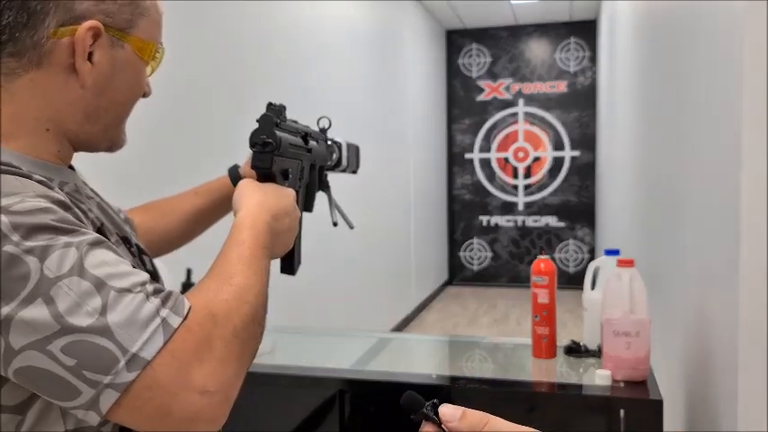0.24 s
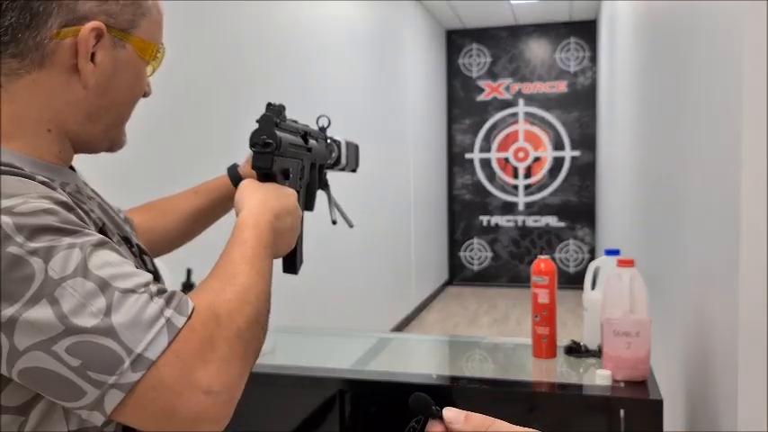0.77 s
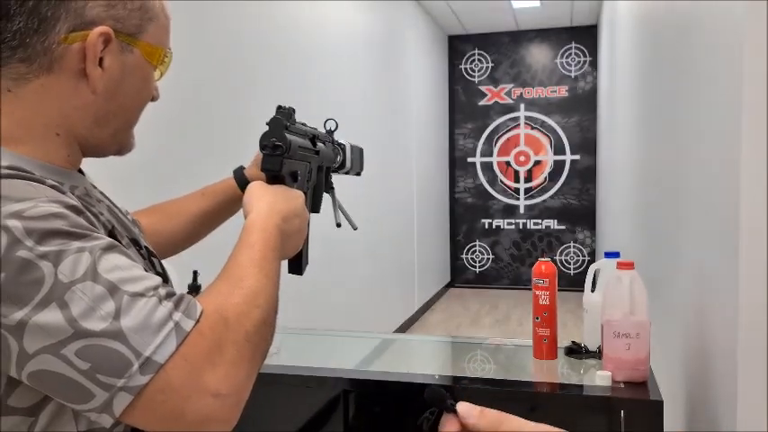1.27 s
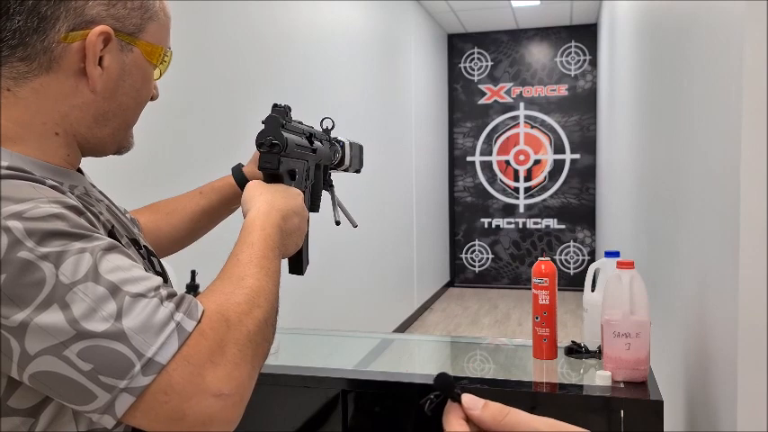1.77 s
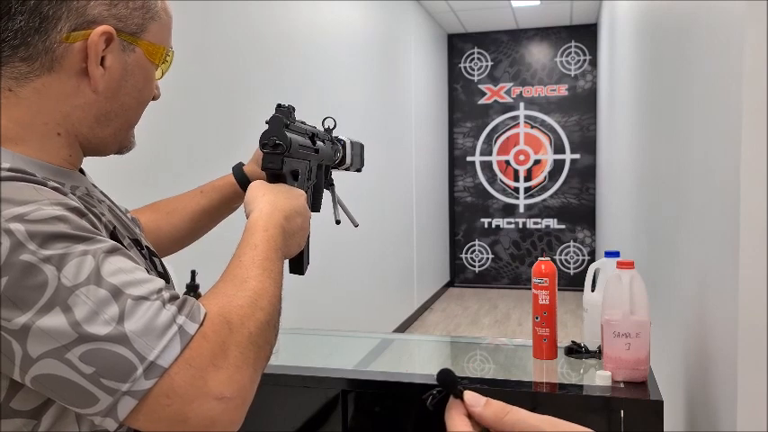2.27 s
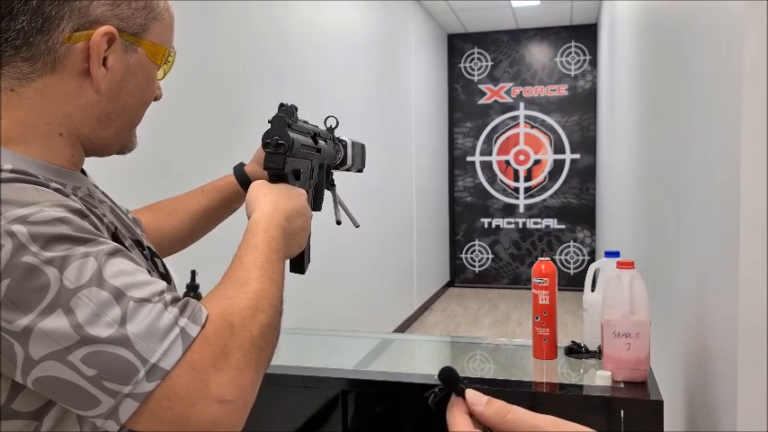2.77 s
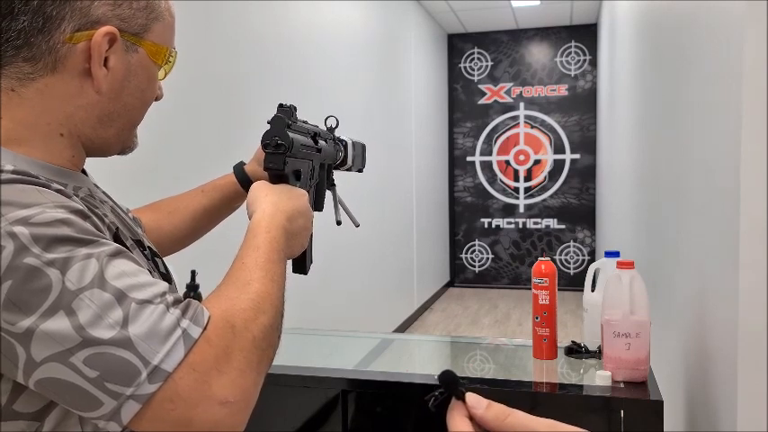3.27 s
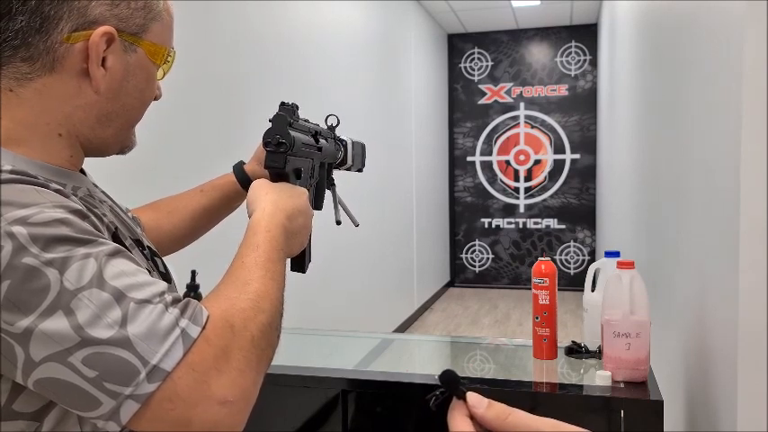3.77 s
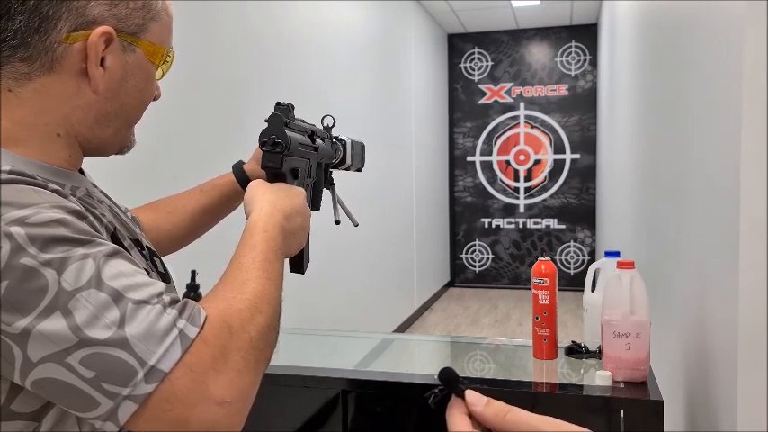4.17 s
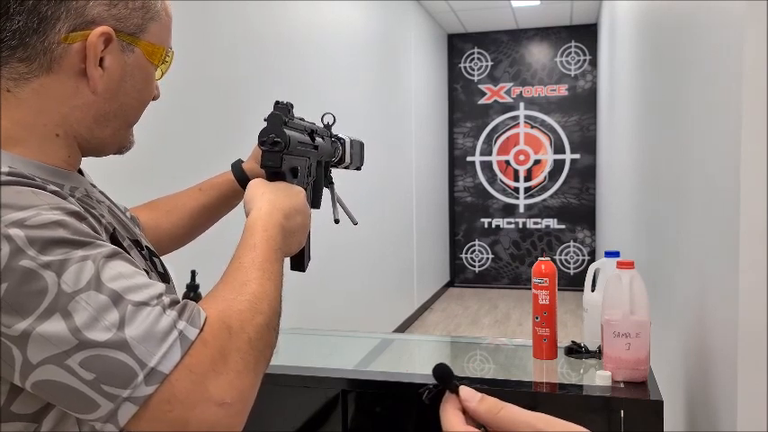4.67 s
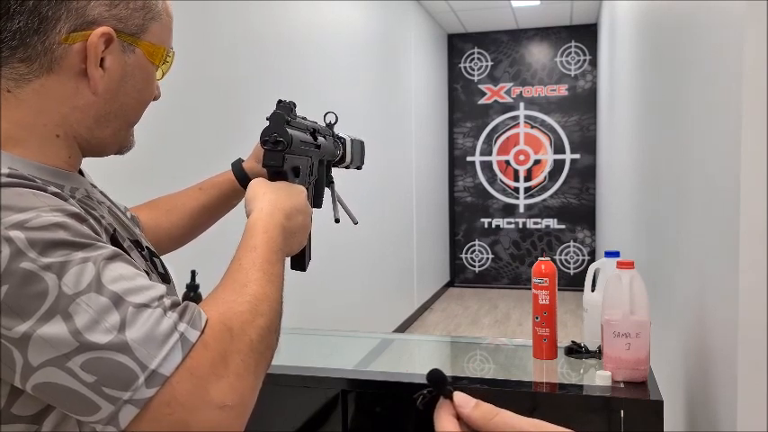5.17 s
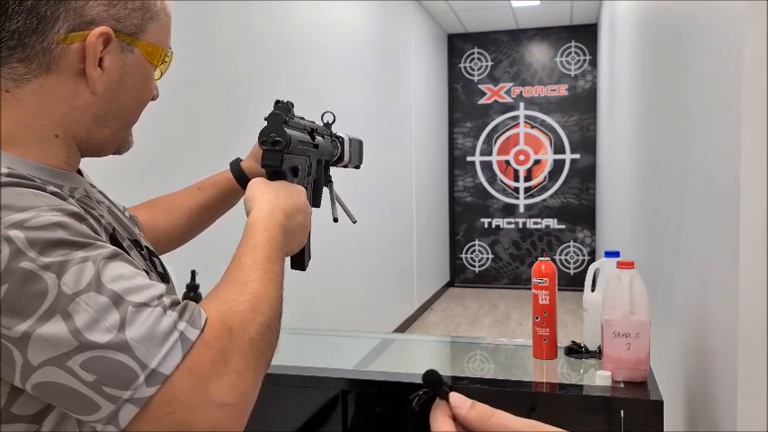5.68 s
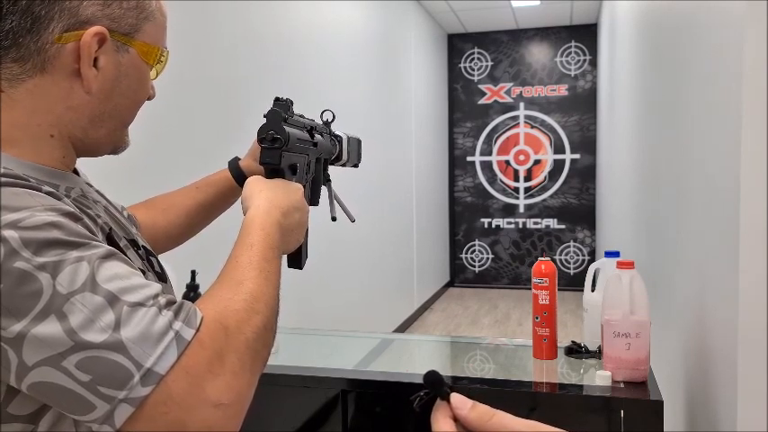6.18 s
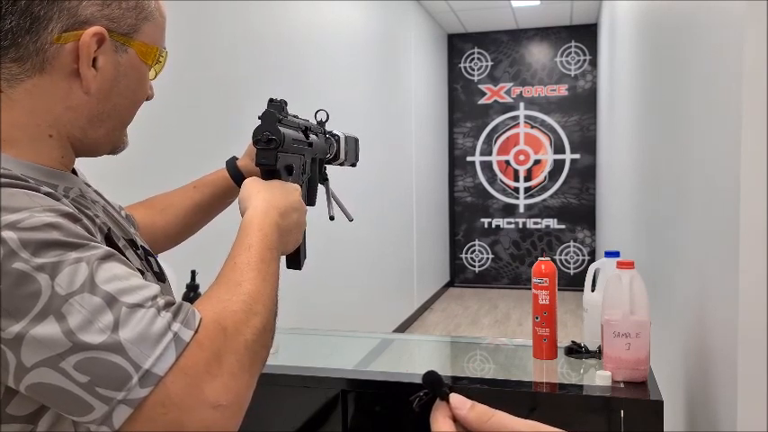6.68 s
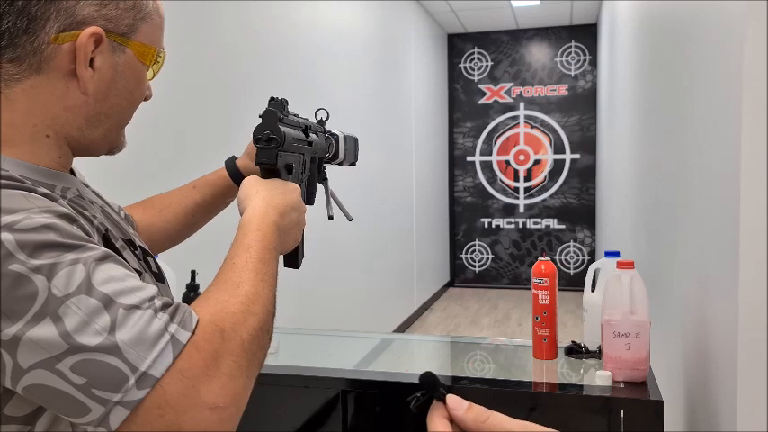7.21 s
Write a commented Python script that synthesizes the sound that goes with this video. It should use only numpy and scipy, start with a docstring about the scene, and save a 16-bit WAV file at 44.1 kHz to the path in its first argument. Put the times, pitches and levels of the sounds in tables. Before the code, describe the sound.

Quiet ventilation with a thin high hiss runs throughout a narrow, bare-walled indoor lane. A small trigger click comes at once, then from 0.14 to 0.35 s a finger rubs the hand-held microphone with a low rumble, faint squeak and three soft bumps. A gas-powered gel blaster fires nine single shots at about 0.4, 1.3, 2.1, 2.8, 3.6, 4.4, 5.4, 6.2 and 7.0 s. Each is close and loud: hammer snap, hollow pop with gas puff, and metallic bolt clatter packed into under a tenth of a second, peaks rounded off. Echoes swell back from the walls, boomy and slightly ringing, fading over roughly half a second. About 0.2 s after each shot, a small bright slap marks the gel ball hitting the target. A dry plastic-and-metal trigger reset click precedes every shot by 0.1 s or more, except the first, which precedes it by nearly 0.4 s.

```python
"""Gel blaster in an indoor lane

A gas blowback gel blaster fires nine single shots down a narrow, hard-walled lane; a trigger reset precedes each.
Shot: noise bursts for sear, hammer, valve and bolt, damped modes for pop and metal ring, a noise puff for the gas.
Noise-built echoes and standing waves make the lane boom; each gel ball then slaps the target.
A finger rubs the hand-held microphone once and bumps it three times, over quiet ventilation; peaks are rounded off.
"""
import sys
import numpy as np
from scipy import signal
from scipy.fft import rfft, irfft, next_fast_len
from scipy.io import wavfile
from scipy.ndimage import map_coordinates

SR = 44100
rng = np.random.default_rng(int(sys.argv[2]) if len(sys.argv) > 2 else 0)


def bounce(signal):
    """Save signal as a 16-bit WAV file at the path given by the first command-line argument."""
    frames = np.transpose(np.atleast_2d(signal))
    limited = np.clip(frames, -1, 1)
    pcm = np.round(limited * 32767).astype(np.int16)
    wavfile.write(sys.argv[1], SR, pcm)


N = 328320
T = np.arange(SR) / SR  # time axis of one event, s
LEAD_S = .02  # room ahead of an event's nominal time, for sounds that precede it

# shots: hammer_s, action_db, flight_s (hammer to slap), slap_db
SHOTS = [(.402, 1.5, 0.19, -19), (1.332, -1.5, 0.2, -21), (2.055, 1, 0.19, -19), (2.842, .5, 0.19, -15),
         (3.601, 1.5, 0.2, -16.5), (4.369, 1, .201, -17.5), (5.366, 0.5, .194, -14), (6.158, 0, 0.2, -15.5),
         (7.038, -0.5, 0.22, -17.5)]
# relative spectrum of trigger and sear parts: freq_hz, density_db_per_hz
LEVER = [(100, -21.5), (300, -16), (700, 4), (900, -2), (1900, 0.5), (3500, -5), (7000, -13.5),
         (12000, -16), (16000, -29.5)]
# relative spectrum of the plastic receiver: freq_hz, density_db_per_hz
RECEIVER = [(150, -20), (480, -15.5), (640, 1), (850, -7.5), (1200, -6), (2500, -12.5), (7000, -23),
            (14000, -37.5)]
# relative spectrum of a finger on the microphone: freq_hz, density_db_per_hz
FINGER = [(15, -46.5), (25, -10), (93, 3.5), (312, -4), (425, -2), (772, -8.5), (1640, -25), (2500, -21),
          (3250, -48.5), (5500, -120)]
# relative spectrum of the microphone shell: freq_hz, density_db_per_hz
SHELL = [(1000, -35.5), (2700, -24), (3020, -8), (3130, -3), (3250, -14), (3700, -27), (4900, -35),
         (6500, -28), (10000, -41), (12800, -24), (14000, -43.5)]


def amp(db):
    """Decibels to gain."""
    return 10 ** (np.asarray(db) / 20)


def unit(x):
    """Scale to rms 1."""
    return x / np.sqrt(np.mean(x ** 2) + 1e-20)


def along(points, hz):
    """Interpolate (Hz, value) points on a log frequency axis."""
    f, v = np.transpose(points)
    return np.interp(np.log(hz + 1), np.log(f + 1), v)


def add(track, start_s, x):
    """Mix x into the track from start_s."""
    i = max(round(start_s * SR), 0)
    track[i:i + len(x)] += x[:N - i]


def coloured(x, colour, size=4096):
    """Causal minimum-phase filter of unit energy with the given spectrum."""
    log_gain = np.log(amp(along(colour, np.fft.rfftfreq(size, 1 / SR))))
    cepstrum = irfft(log_gain)
    fold = 1 + np.sign(size // 2 - np.arange(size))
    h = irfft(np.exp(rfft(cepstrum * fold)))
    return signal.fftconvolve(x, h / np.linalg.norm(h))[:len(x)]


def fade(start_s, t60_s, attack_s):
    """Exponential rise (time constant attack_s) times exponential decay."""
    t = np.maximum(T - start_s, 0)
    return (1 - np.exp(-t / attack_s)) * amp(-60 * t / t60_s)


def grainy(spread):
    """Noise of rms 1 whose samples vary in size, so that single ticks stand out."""
    size = np.exp(spread * rng.standard_normal(SR))
    return unit(rng.standard_normal(SR) * size)


def bursts(stages, colour, scatter_db=0.5, grain=.5):
    """Clatter: coloured grainy noise under one decaying envelope per stage, each of random size."""
    power = 0
    for start_s, level_db, t60_s in stages:
        level = amp(level_db + scatter_db * rng.normal())
        power = power + (level * fade(LEAD_S + start_s, t60_s, attack_s=0.00013)) ** 2
    return coloured(np.sqrt(power) * grainy(grain), colour)


def mode(hz, start_s, level_db, t60_s, attack_s, scatter_db=1, detune=0.0022):
    """Damped resonance, random in pitch (fraction detune) and level on each blow."""
    pitch_hz = hz * (1 + detune * rng.normal())
    level = amp(level_db + scatter_db * rng.normal())
    return level * fade(start_s, t60_s, attack_s) * np.sin(2 * np.pi * pitch_hz * (T - start_s))


def echo_paths(first_rate_hz=120, growth_s=.04, diffuse=.4):
    """Separate wall echoes that multiply into a diffuse wash."""
    rate_hz = first_rate_hz * np.exp(T / max(growth_s, .005))
    chance = np.clip(rate_hz / SR, 1e-4, 1)
    echoes = (rng.random(SR) < chance) * rng.choice([-1, 1], SR) / np.sqrt(chance)
    return unit(echoes + diffuse * rng.standard_normal(SR))


def falling_ring(hz, t, rest_hz=2900, glide_s=0.032, ring_db=1.8):
    """Gain of a faint narrow band that slides down through the echoes and settles."""
    centre_hz = rest_hz + 2200 * np.exp(np.clip((.135 - t) / glide_s, -20, 5))
    offset = hz[:, None] / centre_hz - 1
    return amp(ring_db * np.exp(-(offset / 0.083) ** 2))


def surges(count=2):
    """Echo level in dB: thin until the end wall answers, then a swell per round trip of the lane."""
    first_return_s, round_trip_s, early_db = .046, 0.088, -2.5
    surge_db, kept, rise_s, fall_s = 5.5, 0.54, 0.0072, 0.038  # kept: share of one swell in the next

    def arrived(at_s):
        return .5 + .5 * np.tanh(2 * (T - at_s) / rise_s + 1)

    swells = 0
    for k in range(count):
        at_s = first_return_s + round_trip_s * k
        swells = swells + kept ** k * arrived(at_s) * np.exp(-np.maximum(T - at_s, 0) / fall_s)
    return early_db * (1 - arrived(first_return_s)) + surge_db * swells


def room(x, wet_db, paths, steady_hz=600):
    """Reverberation: long waves mostly repeat their paths, short ones are drawn anew for each sound."""
    # echo decay: freq_hz, t60_s
    decay = [(60, 0.41), (200, 0.71), (450, 0.71), (1100, 0.57), (2000, 0.59), (3000, 0.64), (7000, 0.58),
             (10000, 0.5), (13000, 0.44), (16000, 0.26)]
    # relative wall reflection: freq_hz, returned_db
    walls = [(40, -14.5), (90, -9), (130, -2.5), (200, -2), (300, -0.5), (460, 1.5), (600, -3.5), (900, -3),
             (1100, 2.5), (1400, -3), (2500, -3.5), (4000, -2), (7200, 2.5), (11000, -1.5), (14000, -0.5),
             (16000, -6)]
    hz, t, z = signal.stft([paths, echo_paths()], SR, nperseg=256)
    same = (0.75 / (1 + (hz / steady_hz) ** 2)).clip(0, 1)[:, None]
    mixed = np.sqrt(same) * z[0] + np.sqrt(1 - same) * z[1]
    mixed = mixed * amp(-60 * t / along(decay, hz)[:, None])
    echoes = signal.istft(mixed * falling_ring(hz, t), SR, nperseg=256)[1][:SR]
    tail = coloured(echoes, walls) * amp(surges())
    return x + amp(wet_db) * signal.fftconvolve(x, tail / np.linalg.norm(tail))[:SR]


def background(air_db=-67, hiss_db=-76):
    """Ventilation: steady broadband noise with a thin, high band of hiss."""
    # relative ventilation spectrum: freq_hz, density_db_per_hz
    air = [(25, -11), (65, -2.5), (110, -6), (220, -9), (500, -14), (700, -13), (1100, -15), (1500, -14.5),
           (3000, -17), (5000, -22), (7500, -26.5), (12000, -32.5), (16000, -42)]
    hiss = [(4000, -42.5), (5500, -11), (5850, 0), (6250, -13), (8000, -40.5)]
    low = amp(air_db) * coloured(rng.standard_normal(N), air)
    return low + amp(hiss_db) * coloured(rng.standard_normal(N), hiss)


def rub(squeak_hz=3130, waver=0.008, waver_rate_hz=160):
    """A finger slides over the microphone shell; its pressure drives a rumble and a faint squeak."""
    start_s, press_s, slide_s, lift_s = .14, .088, .05, .032
    range_db, rumble_db, squeak_db = 18, -47.5, -51  # pressure swing; gains at full pressure
    corners_s = start_s + np.cumsum([0, press_s, slide_s, lift_s])
    touching = (T > corners_s[0]) * (T < corners_s[-1])
    pressure = amp(range_db * np.interp(T, corners_s, [-1, 0, 0, -1])) * touching
    drift = map_coordinates(rng.standard_normal(SR), [T * waver_rate_hz])
    pitch_hz = squeak_hz * (1 + waver * drift)
    squeak = np.sin(2 * np.pi * np.cumsum(pitch_hz) / SR) + 0.88 * coloured(rng.standard_normal(SR), SHELL)
    rumble = coloured(rng.standard_normal(SR), FINGER)
    # the squeak follows pressure more steeply
    return amp(rumble_db) * pressure * rumble + amp(squeak_db) * pressure ** 1.5 * squeak


def handling(thud_cycles=5.5, thud_db=-3, tap_db=-2):
    """Finger on the microphone: a rub, and bumps made of a thud, a soft tap and a short shell ring."""
    # bumps: start_s, level_db, thud_hz, shell_db
    bumps = [(.182, -46, 260, -70), (.211, -38.5, 160.3, -62), (0.311, -37, 58, -49)]
    hand = rub()
    for s, level_db, hz, shell_db in bumps:
        at_s = s - LEAD_S  # bursts() adds the lead back
        thud = mode(hz, s, level_db + thud_db, thud_cycles / hz, attack_s=.001)
        tap = bursts([(at_s, 0, .03)], FINGER) + bursts([(at_s, -9, .016)], RECEIVER)
        shell = bursts([(at_s, shell_db, .045)], SHELL)
        hand = hand + thud + amp(level_db + tap_db) * tap + shell
    return np.pad(hand, (0, N - SR))


def knock(delay_s):
    """Plastic receiver knock: one damped mode and a noise burst."""
    body = mode(635, LEAD_S + delay_s, -13, .035, attack_s=.001, detune=.01)
    return body + bursts([(delay_s, -16.5, .062)], RECEIVER)


def trigger(paths, click_db=2.5, travel_s=0.018):
    """Trigger reset: metal snap and receiver knock, then a knock at the front stop after travel_s."""
    # resets: start_s, knock_db, snap_db, front_stop_db
    resets = [(.027, -39.5, -41, -55.5), (1.1188, -40, -38, -54.5), (1.9125, -35, -37.5, -53.5),
              (2.6978, -35, -37.5, -50), (3.4828, -37, -38.5, -41.5), (4.267, -37, -37, -38),
              (5.229, -41.5, -53.5, -55.5), (6.047, -33.5, -33.5, -47.5), (6.9413, -39, -35, -34)]
    # pawl modes: pitch_hz, level_db, t60_s
    pawl_modes = [(1910, -3.5, .03), (2600, -3.5, 0.0058), (3060, -9.5, 0.067), (4100, -6.5, .02),
                  (4360, -6, .02)]
    track = np.zeros(N)
    impulse = 1. * (np.arange(SR) == round(LEAD_S * SR))
    click = amp(click_db) * coloured(impulse, LEVER)
    for s, knock_db, snap_db, stop_db in resets:
        pawl = sum(mode(hz, LEAD_S, db, t60_s, attack_s=.0002, scatter_db=2.0, detune=0.031)
                   for hz, db, t60_s in pawl_modes)
        snap = click + amp(-12.5) * pawl + bursts([(0, -7.5, 0.016)], LEVER)
        knocks = amp(knock_db) * knock(0) + amp(stop_db) * knock(travel_s)
        add(track, s - LEAD_S, room(knocks + amp(snap_db) * snap, -9.5, paths))
    return track


def target(paths):
    """After its flight each gel ball slaps the target: two close noise bursts."""
    # relative gel slap spectrum: freq_hz, density_db_per_hz
    gel = [(200, -22), (1500, -7), (4000, -8), (7000, 0.5), (9000, -0.5), (12500, 0.5), (16000, -7.5)]
    track = np.zeros(N)
    for s, _, flight_s, slap_db in SHOTS:
        slap = bursts([(0, 1, .016), (.003, 6.8, 0.0075)], gel)
        add(track, s + flight_s - LEAD_S, amp(slap_db) * room(slap, -12.5, paths))
    return track


def boom():
    """The pop slaps back from side and end walls and excites the lane's standing waves."""
    # hollow wall slaps: pitch_hz, delay_s, level_db, t60_s
    slap_modes = [(769, .016, -16, 0.1), (289.6, 0.038, -9, 0.092), (1095, 0.045, -13, 0.098),
                  (439.3, .053, -10.5, 0.12), (424.6, 0.092, -12.5, .08)]
    # standing waves: pitch_hz, delay_s, relative_db, t60_s
    lane_modes = [(128.3, .035, -22.5, .42), (174.6, 0.038, -31, .45), (252, .05, -28.5, 0.56),
                  (271.7, .04, -27.5, 0.47), (315, .04, -27, 0.59), (394, .05, -31, .5),
                  (420.3, .05, -27.5, 0.6), (459, .06, -25, 0.61), (699.5, .01, -31, 0.82),
                  (751, .008, -24.5, 0.61), (803, 0.018, -28.5, 0.71), (1000, 0.028, -28.5, .6),
                  (1049, .03, -28.5, 0.67), (1108, .04, -34, 0.85)]
    start_s = LEAD_S + .018  # delays count from here
    slaps = sum(mode(hz, start_s + s, db, t60_s, attack_s=0.012, scatter_db=0.5, detune=0.0055)
                for hz, s, db, t60_s in slap_modes)
    waves = sum(mode(hz, start_s + s, db - 2.0, t60_s, attack_s=0.0046, scatter_db=0.3, detune=0.0014)
                for hz, s, db, t60_s in lane_modes)
    return slaps + waves


def muzzle(delay_s=.0178):
    """Gas leaves the barrel: hollow pop (damped modes) and turbulent puff (noise), returned apart."""
    # pop resonances: pitch_hz, level_db, t60_s
    pop_modes = [(155, -17.5, 0.067), (293, -14.5, 0.046), (478, -17.5, 0.061), (766, -17, 0.11),
                 (1074.6, -4.5, .055), (1267, -15, 0.095), (1563, -15, 0.055), (1980, -13, 0.066)]
    # gas bursts: after_hammer_s, level_db, t60_s
    gas_stages = [(.0175, -2, 0.041), (.026, -15.5, .04)]
    # relative puff spectrum: freq_hz, density_db_per_hz
    puff_colour = [(25, -21.5), (60, -12), (140, -0.5), (600, -1), (1100, 0), (2200, 1.5), (4000, -4.5),
                   (8000, -5), (12000, -3.5), (16000, -12.5)]
    pop = sum(mode(hz, LEAD_S + delay_s, db, t60_s, attack_s=0.0016, detune=0.009)
              for hz, db, t60_s in pop_modes)
    return pop, bursts(gas_stages, puff_colour)


def action(rear_s):
    """Hammer opens the valve; gas throws the bolt to its rear stop, the spring drives it home, rattling."""
    # sear, hammer, valve; sear slip and bolt rocking as it settles: after_hammer_s, level_db, t60_s
    sear = [(-.0093, -31, 0.055)]
    hammer = [(0, -14, .022), (.0025, -3.5, 0.015), (.0095, -10.5, .025)]
    valve = [(.0100, -15, 0.032), (.0122, -6, .025)]
    ticks = [(-.0085, -29, .014), (.153, -25, .025), (.160, -21.5, .026)]
    # bolt contacts: after_stop_s, level_db, t60_s
    rear_stop = [(0, -2, .017), (.006, -12.5, .018)]
    home_stop = [(0, -12.5, .018), (.026, -14.5, .016)]
    # bolt and barrel ring: pitch_hz, relative_db, t60_s
    ring_modes = [(1558, -31.5, 0.25), (1917, -28, 0.22), (2230, -33, 0.45), (2400, -35.5, .3),
                  (2790, -34.5, 0.2), (4810, -36, 0.28), (5830, -35, 0.19), (7270, -30.5, 0.4),
                  (10000, -33, .25)]
    # relative spectra of steel, gas jet, bolt: freq_hz, density_db_per_hz
    steel = [(100, -31), (380, -17.5), (650, 0.5), (1200, -5.5), (2600, -5.5), (4500, -0.5), (7000, -1.5),
             (9000, -4), (11000, -0.5), (16000, -10.5)]
    jet = [(60, -11), (150, -1), (400, -4), (650, 9.5), (900, 0.5), (1350, -4.5), (1800, 5.5), (2800, -3),
           (7000, -7), (11000, 3.5), (16000, -13)]
    bolt_colour = [(60, -13), (300, -5), (750, 4.5), (1100, 2), (1500, -4.5), (3000, 3), (7000, -1),
                   (12000, 1.5), (16000, -10)]
    home_s = rear_s + .0225 + .003 * rng.normal()  # spring return and its scatter
    bolt = [(rear_s + s, db, t60_s) for s, db, t60_s in rear_stop]
    bolt += [(home_s + s, db, t60_s) for s, db, t60_s in home_stop]
    ring = sum(mode(hz, LEAD_S + .012, db, t60_s, attack_s=.01, scatter_db=0.5, detune=.002)
               for hz, db, t60_s in ring_modes)
    strikes = bursts(sear, LEVER) + bursts([*hammer, *ticks], steel)
    return amp(-1.0) * ring + strikes + bursts(valve, jet) + bursts(bolt, bolt_colour)


def shots(paths):
    """Firing cycles with the lane's answer; as the gas cools the bolt is later with every shot."""
    first_rear_s, later_s = .0338, .00042  # bolt at rear stop after the hammer; delay added per shot
    pop_db, first_puff_db, puff_rise_db = 0, 0.37, 0.02  # the puff rises slightly per shot
    track = np.zeros(N)
    for k, (s, action_db, _, _) in enumerate(SHOTS):
        pop, puff = muzzle()
        blast = amp(pop_db) * (room(pop, -10.5, paths) + boom())
        gas = amp(first_puff_db + puff_rise_db * k) * room(puff, 1, paths)
        mechanism = amp(action_db) * room(action(first_rear_s + later_s * k), 0.49, paths)
        add(track, s - LEAD_S, mechanism + blast + gas)
    return track


def scene():
    """Everything in one room, at one microphone."""
    paths = echo_paths()
    mix = background() + handling() + trigger(paths) + target(paths) + shots(paths)
    return mix[None]


def record(dry, ceiling=0.94, top_hz=15900):
    """The microphone rounds off the loudest peaks, shapes the spectrum and cuts above its band limit."""
    # microphone response: freq_hz, gain_db
    response = [(15, -23.5), (35, -5.5), (60, -0.5), (13000, 0), (15800, -1.5)]
    squashed = dry / (1 + np.abs(dry / ceiling) ** 5) ** (1 / 5)
    m = next_fast_len(N + SR)
    hz = np.fft.rfftfreq(m, 1 / SR)
    band = np.clip((top_hz - hz) / 400 + .5, 0, 1)
    return irfft(rfft(squashed, m) * amp(along(response, hz)) * band, m)[:, :N]


dry = scene()
out = record(dry)
bounce(out)
```